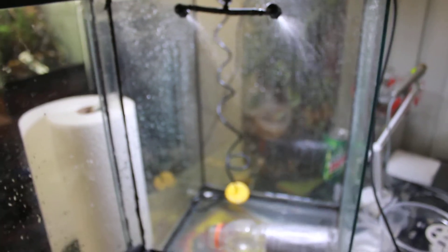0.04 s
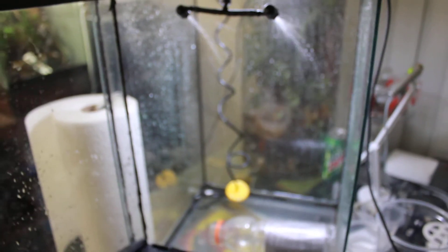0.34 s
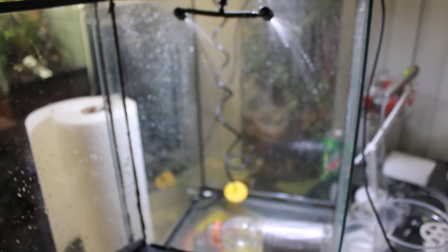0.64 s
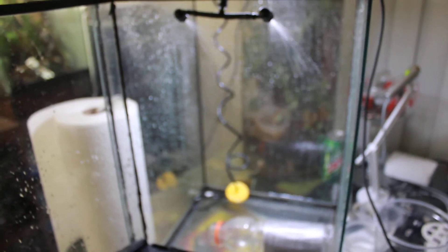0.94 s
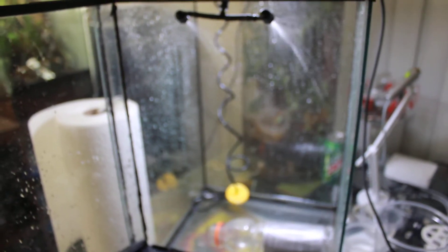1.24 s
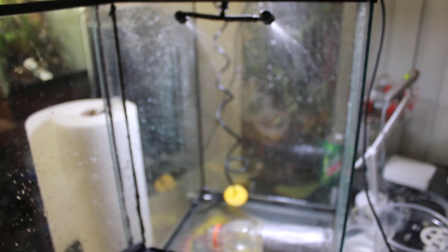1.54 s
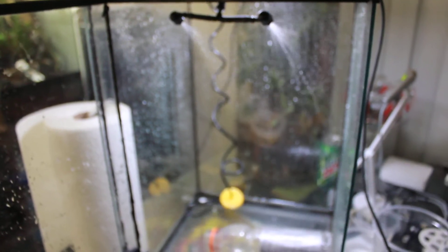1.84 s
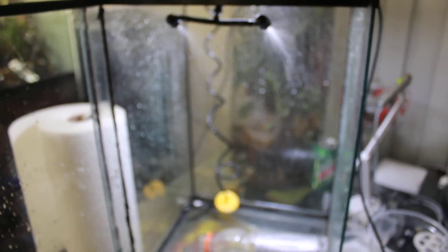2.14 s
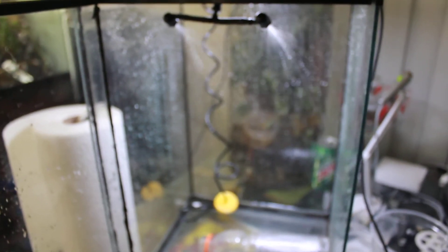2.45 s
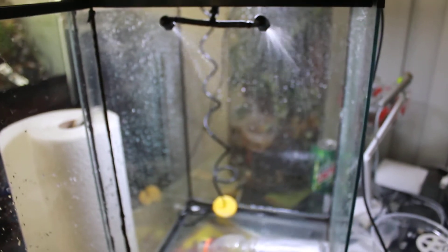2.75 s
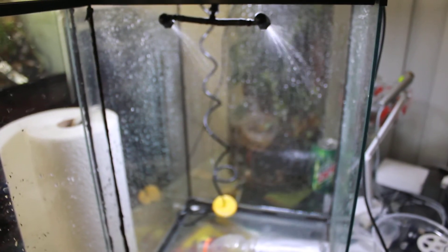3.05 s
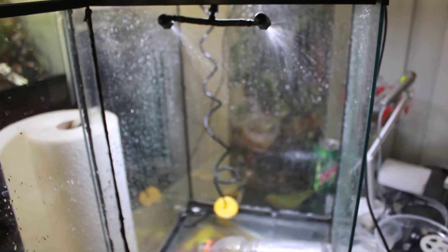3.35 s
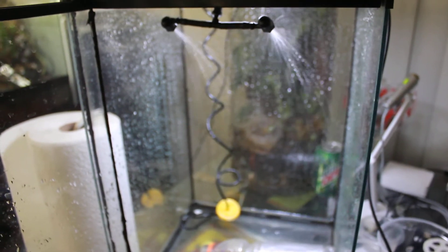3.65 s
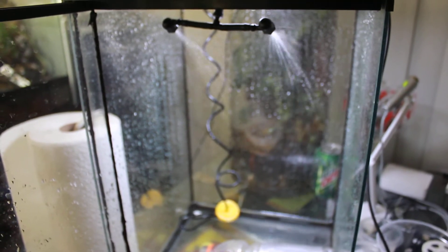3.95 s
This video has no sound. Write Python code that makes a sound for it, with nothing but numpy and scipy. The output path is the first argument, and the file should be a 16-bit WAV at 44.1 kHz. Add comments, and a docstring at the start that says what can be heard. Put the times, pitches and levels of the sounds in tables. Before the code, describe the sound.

A small electric pump buzzes close by, steady and raspy, with a quick, regular ticking flutter. Throughout, nozzles hiss mist into a glass tank and tiny droplets tick on the panes. A few faint bumps pass later on.

```python
"""A small mains-powered pump buzzes close by and feeds two misting nozzles in a glass tank.
Each stroke thuds, rings the housing and rasps in the valves, over a steady hum. The strokes drift
in and out of step with the mains, so a loose part ticks in a quick, regular flutter.
Spray hisses, droplets tick on the glass, the panes add a short echo and a few soft bumps pass.
Faint tones waver behind it all, the low ones from a second motor or fan nearby."""
import sys
import numpy as np
from scipy import signal
from scipy.fft import rfft, irfft, next_fast_len
from scipy.io import wavfile
from scipy.ndimage import map_coordinates

SR = 44100
rng = np.random.default_rng(int(sys.argv[2]) if len(sys.argv) > 2 else 0)


def log_audio(samples):
    """Write samples as a 16-bit WAV file to the path given in sys.argv[1]."""
    # one column per channel
    frames = np.atleast_2d(samples).T
    # limit to full scale, then quantise
    limited = np.clip(frames, -1, 1)
    pcm = np.round(limited * 32767).astype(np.int16)
    wavfile.write(sys.argv[1], SR, pcm)


N = 176400  # 4 seconds
MAINS_HZ, MAINS_LAG_CYCLES = 59.97, .84  # the lag says where in each cycle the mains pulls hardest


# How fast the pump runs. Each row: time in seconds, strokes per second.
PUMP_SPEED = [(0, 109.77), (1, 109.87), (2, 109.93), (2.5, 109.98), (3, 110.1), (3.5, 110.16), (4, 109.9)]

def stroke_count():
    """The pump's speed adds up to the number of strokes done so far."""
    return np.cumsum(np.interp(clock(), *np.transpose(PUMP_SPEED))) / SR


def pump_strokes(count):
    """Each stroke's strength and timing depend on where it falls in the mains cycle."""
    times = np.interp(np.arange(1, int(count[-1]) + 1), count, clock())
    pull = np.cos(2 * np.pi * (times * MAINS_HZ - MAINS_LAG_CYCLES))
    times = times + .0005 * pull + .00003 * rng.standard_normal(len(times))
    scatter_db = .8 * rng.standard_normal(len(times))
    force = amp(.5 * pull + scatter_db)
    thud_force = amp(-4 * pull + scatter_db)
    # Thud, rasp and slap start 2 to 3 milliseconds before the housing rings.
    return (thud(times - .002, thud_force) + housing_ring(times, force)
            + valve_rasp(times - .003, force) + valve_slap(times - .0021, force))


# The low tone of a thud. Each row: frequency in Hz, level in dB per Hz.
THUD_SPECTRUM = [(100, -100), (250, -76.5), (400, -88), (620, -89), (700, -69), (870, -71), (1100, -79),
                 (1500, -79), (3000, -100)]

def thud(times, force):
    """Each stroke lands with a short, dull knock."""
    return coloured(bursts(times, force, attack_s=.0004, decay_s=.0027), THUD_SPECTRUM)


# The tone of the pump's housing. Each row: frequency in Hz, level in dB per Hz.
HOUSING_SPECTRUM = [(500, -110), (1100, -88), (1300, -79.5), (1700, -77), (2100, -64.5), (2400, -73.5),
                    (2650, -69), (3100, -72), (3700, -64.5), (4400, -74.5), (5400, -73.5), (7000, -70),
                    (12000, -90)]

def housing_ring(times, force, decay_s=.0062):
    """Each stroke sets off the same brief ring in the housing."""
    t = clock()[:SR // 20]
    ring = rng.standard_normal(len(t)) * np.exp(-t / decay_s)
    return coloured(signal.fftconvolve(pulses(times, force), ring)[:N], HOUSING_SPECTRUM)


# The bright tone of the rasp. Each row: frequency in Hz, level in dB per Hz.
RASP_SPECTRUM = [(2500, -94), (4500, -83), (5300, -71), (6500, -74), (8200, -69.5), (9100, -71),
                 (9900, -66.5), (10600, -68.5), (11200, -74), (12000, -85), (12500, -70.5), (13100, -76),
                 (13700, -82), (15700, -86)]

def valve_rasp(times, force):
    """The valves give a scratchy puff on every stroke."""
    return coloured(bursts(times, force, attack_s=.00089, decay_s=.0031), RASP_SPECTRUM)


# The notes the valves ring at. Each row: pitch in Hz, width in Hz, peak level in dB per Hz.
VALVE_NOTES = [(3866, 190, -63.5), (4986, 79, -63.5), (5260, 98, -63), (6100, 150, -86), (6700, 110, -68),
               (7373, 185, -55.5), (7730, 230, -59), (13600, 160, -75)]

def valve_slap(times, force):
    """A sharp slap on every stroke makes the valves ring."""
    def resonances(f):
        return sum((-1) ** k * amp(db) * 1j * f * width / (hz * hz - f * f + 1j * f * width)
                   for k, (hz, width, db) in enumerate(VALVE_NOTES))
    slap = unit(bursts(times, force, attack_s=.00074, decay_s=.0011))
    return filtered(slap, resonances) * np.sqrt(SR / 2)


# The hum of the strokes. Each row: multiple of the stroke rate, level in dB.
STROKE_TONES = [(1, -52.5), (2, -60), (3, -50.5), (4, -57), (5, -65.5), (6, -54), (7, -48), (8, -60),
                (9, -52.5), (11, -45.5), (12, -47.5), (14, -52.5), (15, -45)]
# The hum of the motor's iron. Each row: multiple of the mains frequency, level in dB.
IRON_TONES = [(4, -63), (12, -51), (64, -48)]

def pump_hum(count):
    """The pump hums; one note of its housing throbs as the strokes slip against the mains."""
    t = clock()
    strokes = sum(tone(round(k) * count, db) for k, db in STROKE_TONES)
    iron = sum(tone(round(k) * MAINS_HZ * t, db) for k, db in IRON_TONES)
    slip = 2 * MAINS_HZ * t - count  # gains about ten cycles a second
    housing_note = tone(13 * count, db=-41.5 + .7 * wobble(6))
    throb = 1 + .62 * np.cos(2 * np.pi * (slip - .72))
    return strokes + iron + housing_note * throb


# The hits in one rattle. Each row: seconds after the strongest mains pull, relative level in dB.
RATTLE_HITS = [(-.0016, -5), (0, 0), (.0017, -4)]
# The thin tone of those hits. Each row: frequency in Hz, level in dB per Hz.
TICK_SPECTRUM = [(1500, -100), (4000, -82.5), (7000, -78), (7600, -66), (9000, -87), (10300, -67.5),
                 (12500, -79), (15700, -92)]

def rattle(count):
    """A loose part chatters once a mains cycle, hardest when a stroke falls at the same moment."""
    peaks = (np.arange(int(N / SR * MAINS_HZ)) + MAINS_LAG_CYCLES) / MAINS_HZ
    after_s, hit_db = np.transpose(RATTLE_HITS)
    times = peaks[:, None] + after_s
    in_step = np.cos(2 * np.pi * np.interp(times, clock(), count))
    db = hit_db + 8 * in_step + 1.5 * rng.standard_normal(times.shape)
    ticks = bursts(times.ravel(), amp(db).ravel(), attack_s=.00004, decay_s=.0005)
    return coloured(ticks, TICK_SPECTRUM)


# The tone of the spray. Each row: frequency in Hz, level in dB per Hz.
SPRAY_SPECTRUM = [(20, -102), (50, -91), (80, -90), (170, -78), (260, -80), (380, -83), (620, -80),
                  (720, -77), (1000, -73), (1150, -75), (1450, -67.5), (1580, -66.5), (1750, -71.5),
                  (1900, -67), (2300, -66), (2500, -71.5), (2650, -63.5), (3150, -74.5), (3600, -67.5),
                  (4300, -68), (5300, -62), (7000, -63.5), (7600, -57.5), (9000, -76.5), (10300, -64.5),
                  (11500, -71.5), (14500, -74), (15700, -83)]

def spray():
    """The nozzles hiss evenly as they make mist."""
    return coloured(rng.standard_normal(N) * amp(.15 * wobble(10)), SPRAY_SPECTRUM)


# The tone of the droplets. Each row: frequency in Hz, level in dB per Hz.
DROPLET_SPECTRUM = [(800, -100), (2500, -77), (5500, -68.5), (9000, -73.5), (15700, -97)]

def droplets(per_second=1200):
    """Tiny drops tick on the glass at random moments."""
    drops = int(per_second * N / SR)
    times = rng.uniform(0, N / SR, drops)
    db = 1.5 * np.minimum(rng.standard_normal(drops), 2.5)
    return coloured(bursts(times, amp(db), attack_s=.00002, decay_s=.00014), DROPLET_SPECTRUM)


def glass_echo(x, level_db=-12, decay_s=.01):
    """The tank's panes add a short, dense echo to a sound."""
    t = clock()[:SR // 10]
    tail = rng.standard_normal(len(t)) * np.exp(-t / decay_s) * (t > .002)
    return x + amp(level_db) * signal.fftconvolve(x, tail / np.linalg.norm(tail))[:N]


# The faint tones. Each row: pitch in Hz, level in dB.
FAINT_TONES = [(131, -63), (147, -62), (262, -54), (456, -63), (703, -59), (830, -58), (879, -58),
               (916, -59), (1455, -54), (1549, -52), (2038, -53), (2207, -51), (2288, -51), (2625, -51),
               (3860, -50), (3937, -43), (7419, -43)]

def wavering_tones():
    """Faint wavering tones, the low ones from a second motor or fan nearby."""
    return sum(tone(hz * clock(), db, drift_radians=.5 * wobble(4.82)) for hz, db in FAINT_TONES)


# The soft bumps. Each row: start in seconds, fade time in seconds, relative level in dB.
BUMP_EVENTS = [(1.83, 0.1, -8), (2.5, 0.084, 2), (2.59, 0.045, -2), (3.128, 0.019, 9), (3.195, 0.022, 7)]
# Their dull tone. Each row: frequency in Hz, level in dB per Hz.
BUMP_SPECTRUM = [(30, -97), (120, -87), (260, -71), (500, -73), (950, -65), (1400, -68), (3000, -80)]

def bumps(attack_s=.0076):
    """Faint bumps and scuffs: dull noise swells quickly and dies away."""
    level = np.zeros(N)
    for start_s, decay_s, db in BUMP_EVENTS:
        t = np.maximum(clock() - start_s, 0)
        level += amp(db) * (1 - np.exp(-t / attack_s)) * np.exp(-t / decay_s)
    return level * coloured(rng.standard_normal(N), BUMP_SPECTRUM)


def amp(db):
    """Turn decibels into a multiplier."""
    return 10 ** (np.asarray(db) / 20)


def unit(x):
    """Scale a sound to an average power of 1."""
    return x / np.sqrt(np.mean(x ** 2) + 1e-20)


def clock():
    """The time of each sample in seconds."""
    return np.arange(N) / SR


def wobble(rate):
    """A smooth curve through `rate` random values a second."""
    values = rng.standard_normal(int(N * rate / SR) + 4)
    return map_coordinates(values, [clock() * rate], mode="nearest")


def tone(cycles, db, drift_radians=0):
    """A pure note that starts at a random point in its wave."""
    return np.sqrt(2) * amp(db) * np.sin(2 * np.pi * (cycles + rng.random()) + drift_radians)


def filtered(x, response):
    """Multiply each frequency in a sound by response(frequency)."""
    size = 2 * next_fast_len(N // 2 + 8192)
    return irfft(rfft(x, size) * response(np.fft.rfftfreq(size, 1 / SR)), size)[:N]


def coloured(x, spectrum):
    """Give a noisy sound the tone and level of a spectrum table."""
    hz, db = np.transpose(spectrum)

    def response(f):
        gain = amp(np.interp(np.log(f + 1), np.log(hz + 1), db))
        cepstrum = irfft(np.log(gain))
        # Keep the first half only, so ringing never comes before a hit.
        cepstrum[1:len(cepstrum) // 2] *= 2
        cepstrum[len(cepstrum) // 2 + 1:] = 0
        return np.exp(rfft(cepstrum))
    return filtered(unit(x), response) * np.sqrt(SR / 2)


def pulses(times, sizes):
    """A clean click at each time, even between two samples."""
    at = times[:, None] * SR
    index = np.floor(at).astype(int) + np.arange(-7, 9)
    shape = np.sinc(index - at) * np.cos(np.pi * (index - at) / 16) ** 2
    inside = (index >= 0) & (index < N)
    return np.bincount(index[inside], (sizes[:, None] * shape)[inside], N)


def bursts(times, sizes, attack_s, decay_s):
    """A puff of noise at each time."""
    t = clock()[:SR // 20]
    shape = (1 - np.exp(-t / attack_s)) * np.exp(-t / decay_s)
    return signal.fftconvolve(pulses(times, sizes), shape)[:N] * rng.standard_normal(N)


def scene():
    """Pump, spray and background, mixed into one channel."""
    count = stroke_count()
    direct = pump_hum(count) + wavering_tones() + rattle(count) + bumps()
    echoing = glass_echo(pump_strokes(count) + spray() + droplets())
    return (direct + echoing)[None]


def record(dry):
    """Cut away the very highest treble."""
    return filtered(dry[0], lambda hz: hz < 15800)[None]


dry = scene()
out = record(dry)
log_audio(out)
```